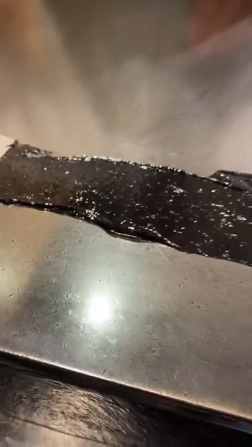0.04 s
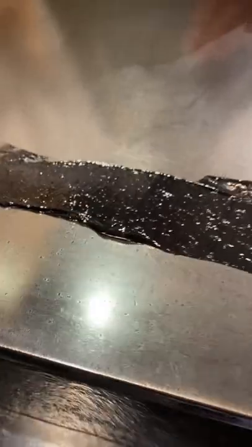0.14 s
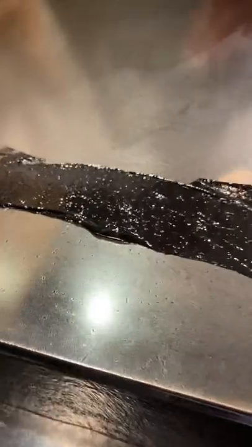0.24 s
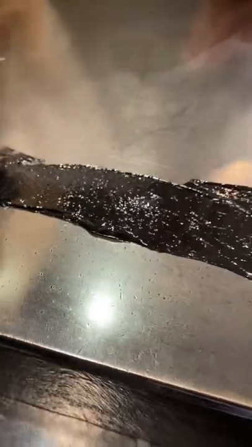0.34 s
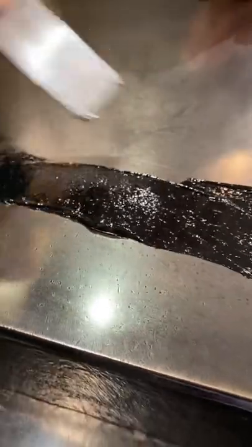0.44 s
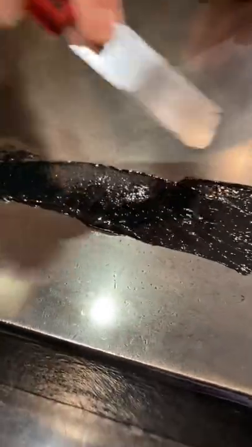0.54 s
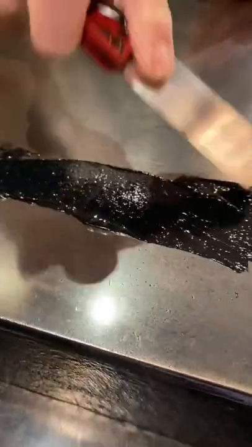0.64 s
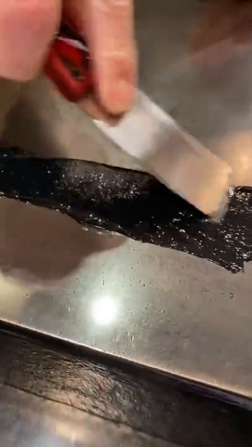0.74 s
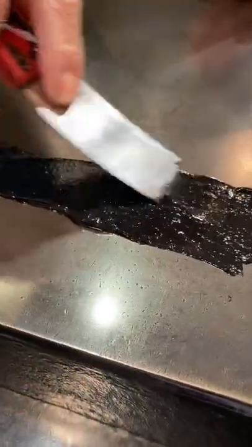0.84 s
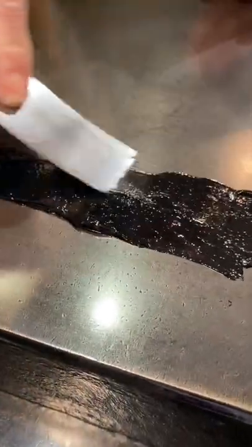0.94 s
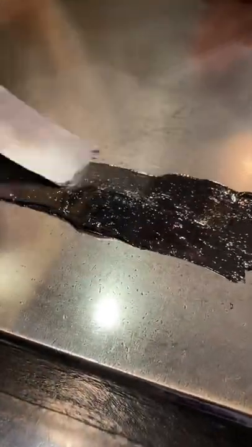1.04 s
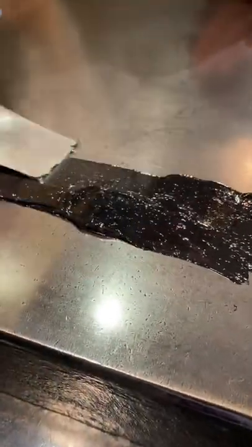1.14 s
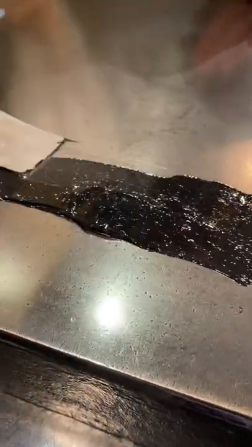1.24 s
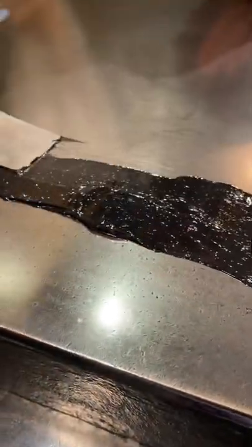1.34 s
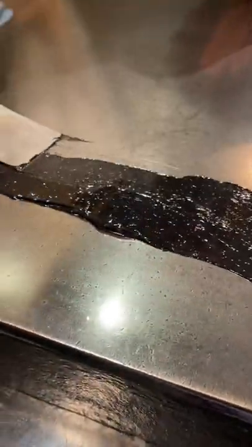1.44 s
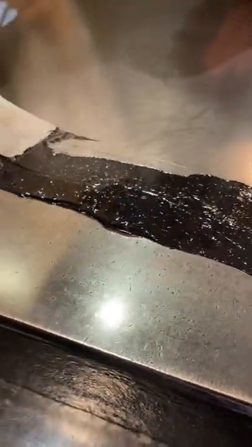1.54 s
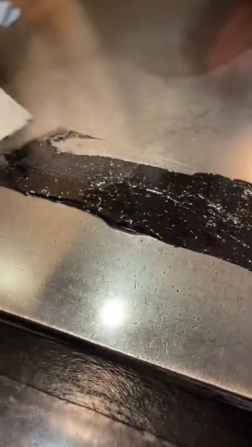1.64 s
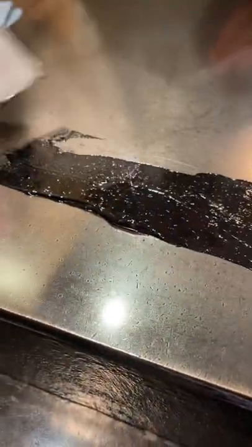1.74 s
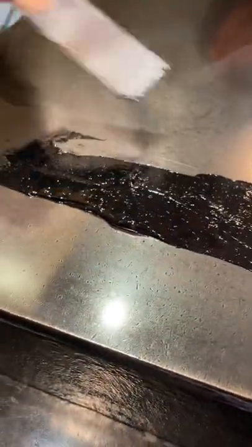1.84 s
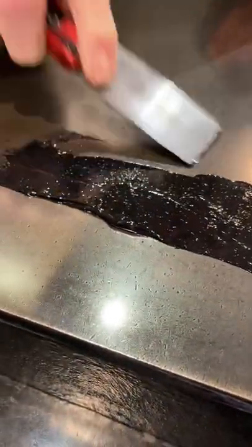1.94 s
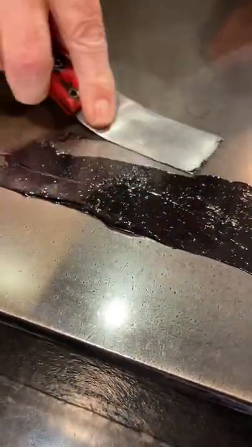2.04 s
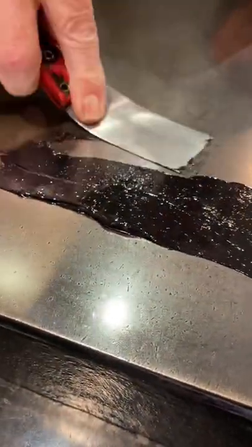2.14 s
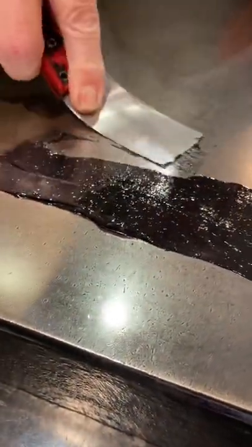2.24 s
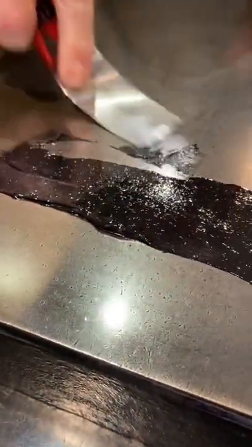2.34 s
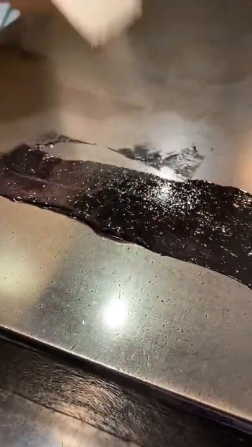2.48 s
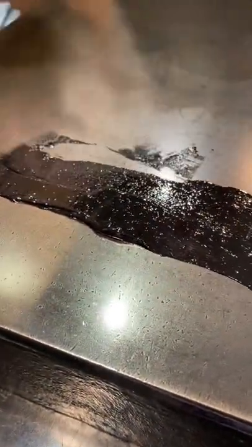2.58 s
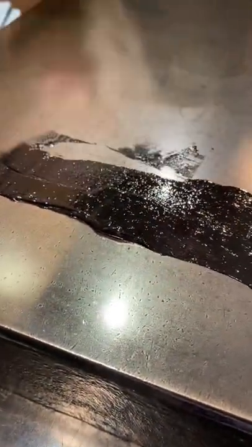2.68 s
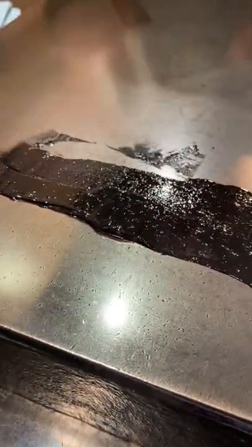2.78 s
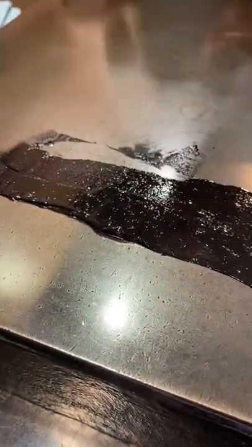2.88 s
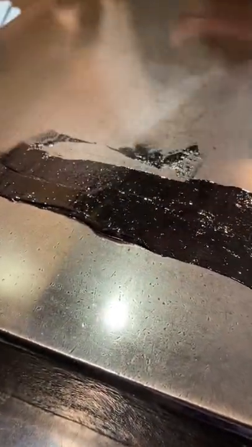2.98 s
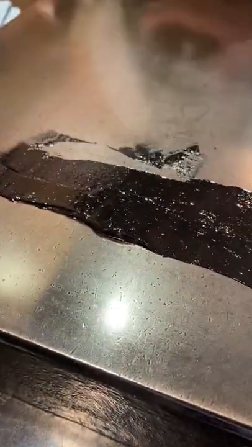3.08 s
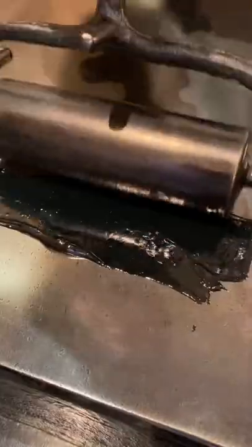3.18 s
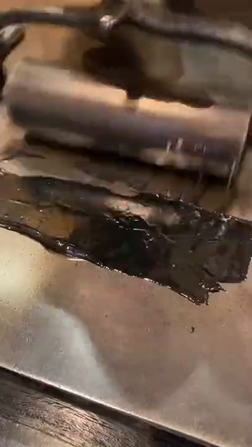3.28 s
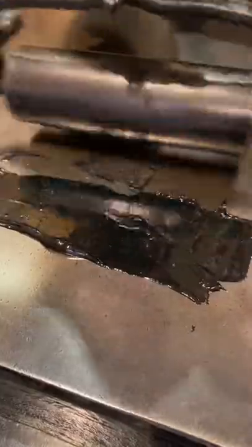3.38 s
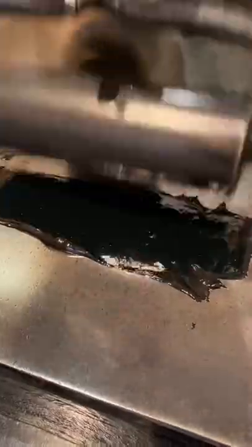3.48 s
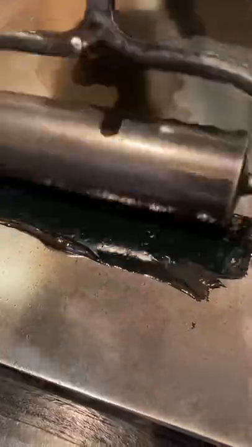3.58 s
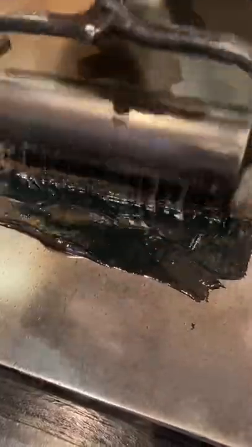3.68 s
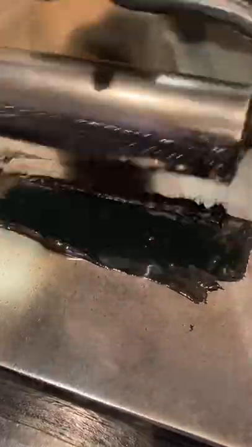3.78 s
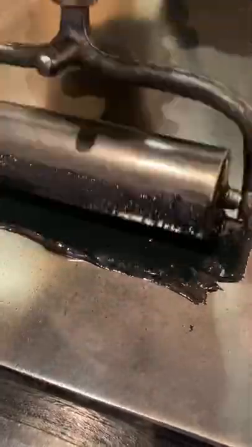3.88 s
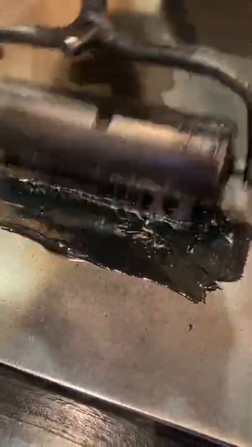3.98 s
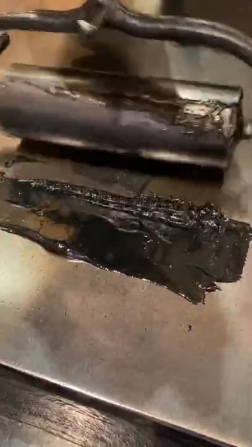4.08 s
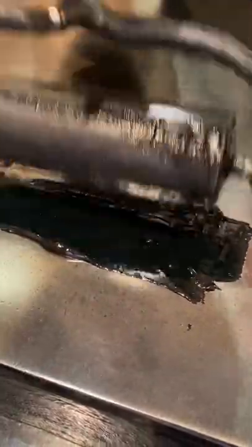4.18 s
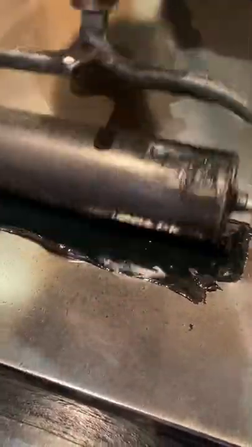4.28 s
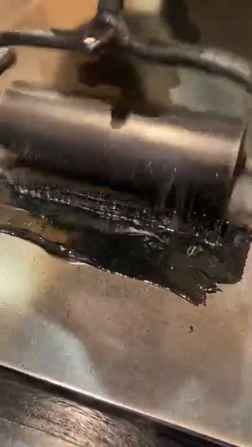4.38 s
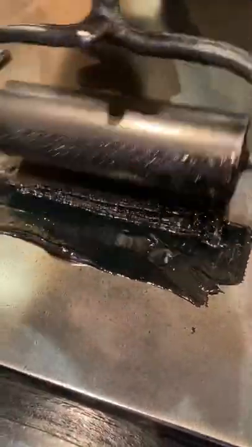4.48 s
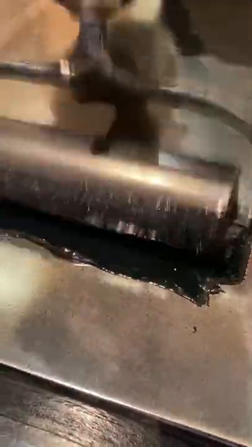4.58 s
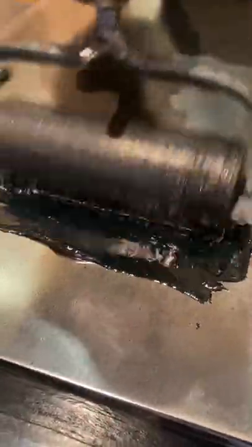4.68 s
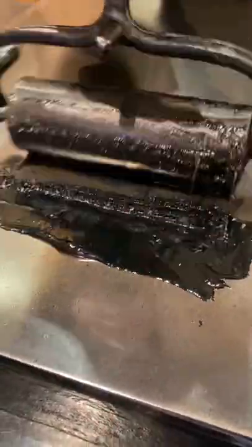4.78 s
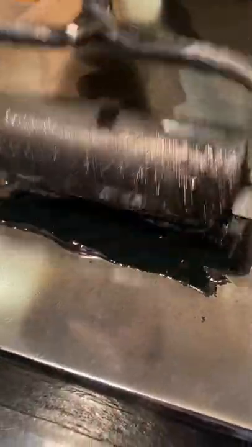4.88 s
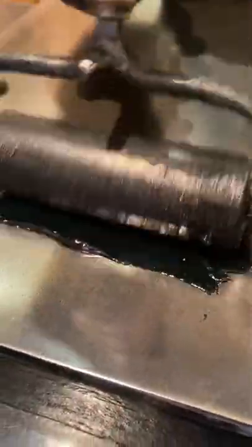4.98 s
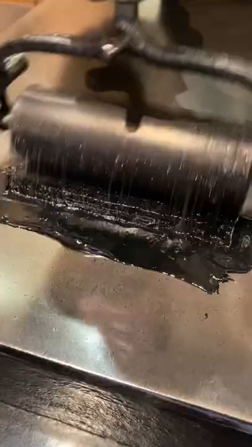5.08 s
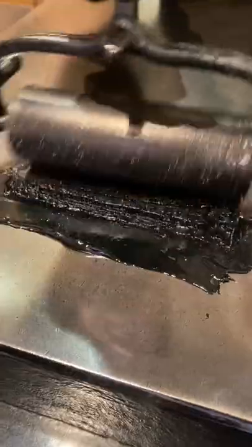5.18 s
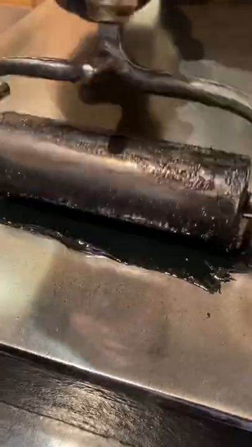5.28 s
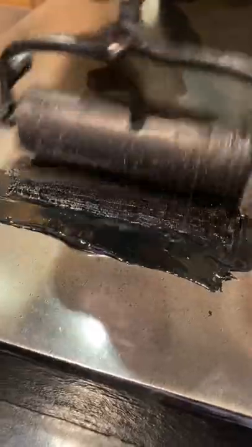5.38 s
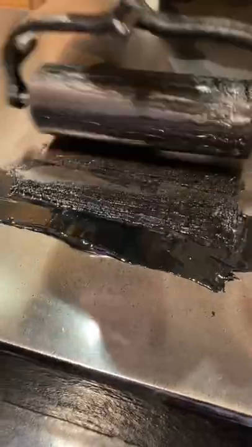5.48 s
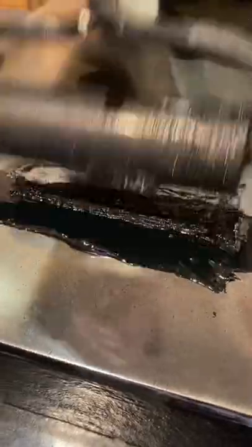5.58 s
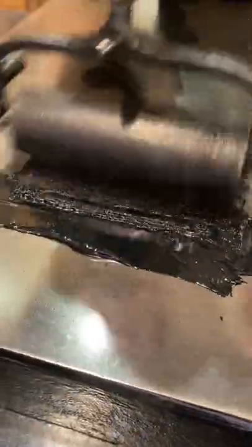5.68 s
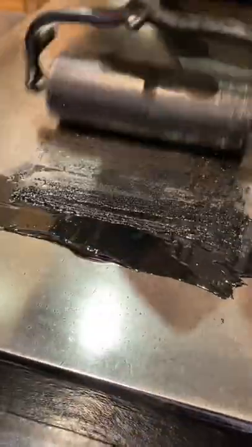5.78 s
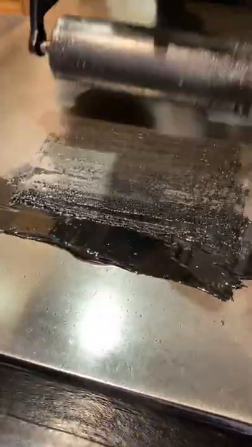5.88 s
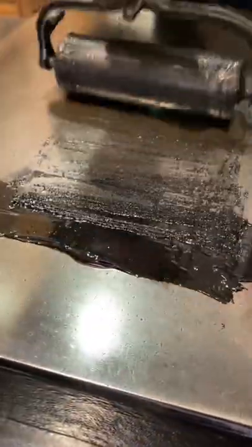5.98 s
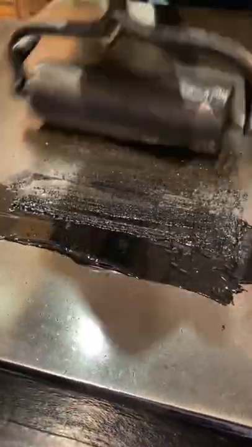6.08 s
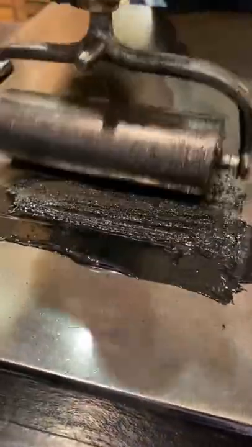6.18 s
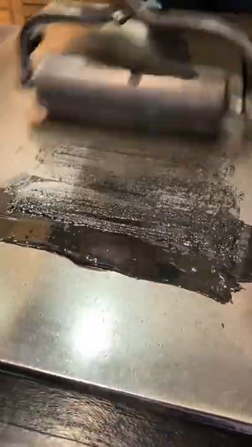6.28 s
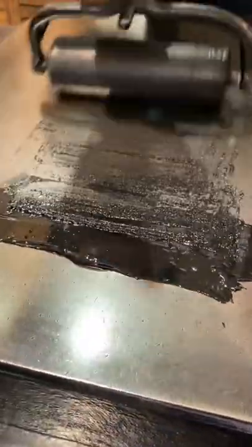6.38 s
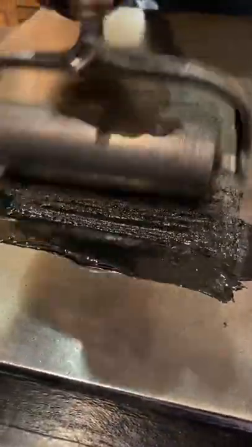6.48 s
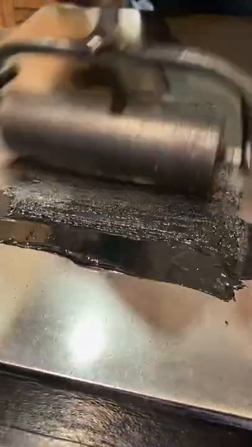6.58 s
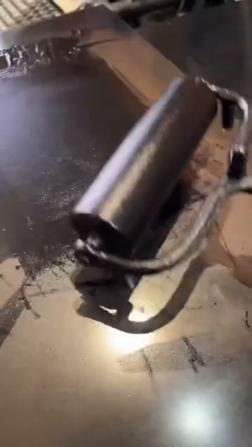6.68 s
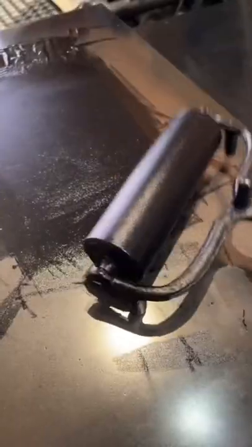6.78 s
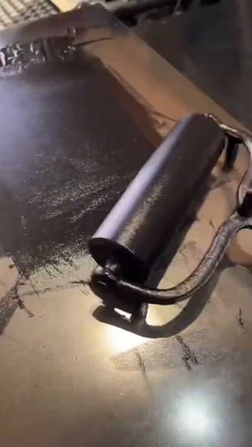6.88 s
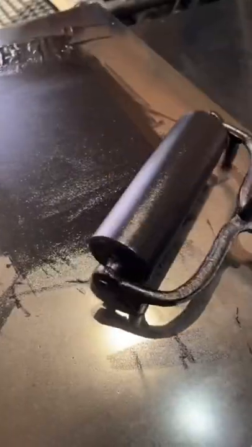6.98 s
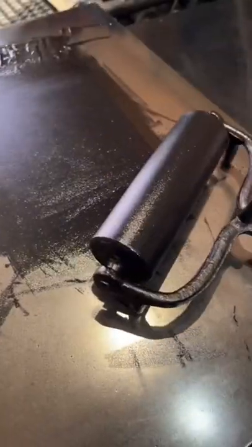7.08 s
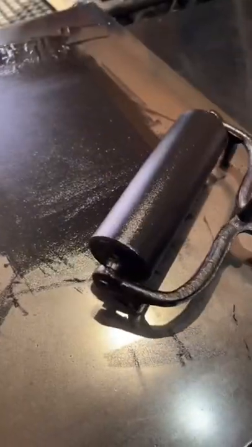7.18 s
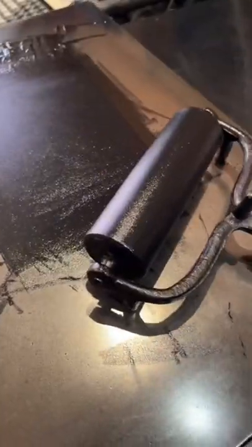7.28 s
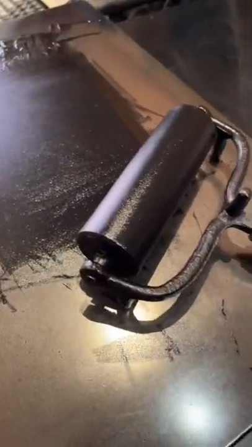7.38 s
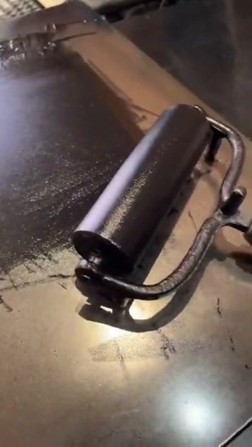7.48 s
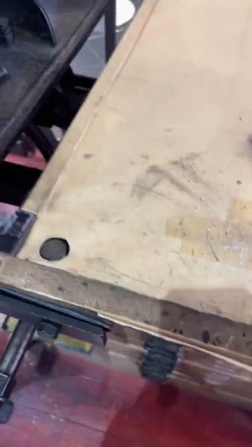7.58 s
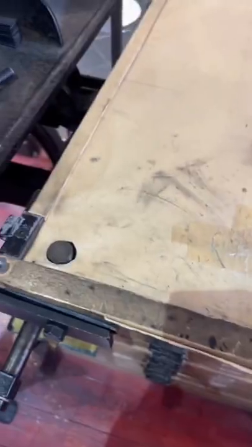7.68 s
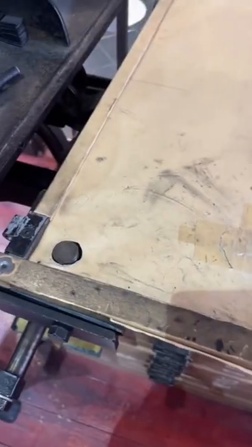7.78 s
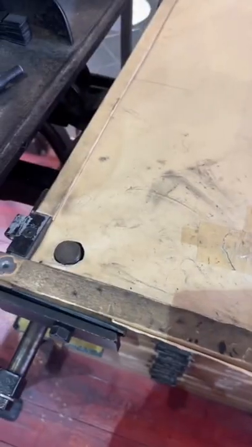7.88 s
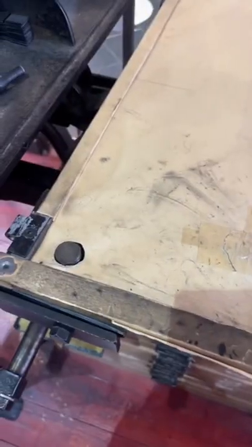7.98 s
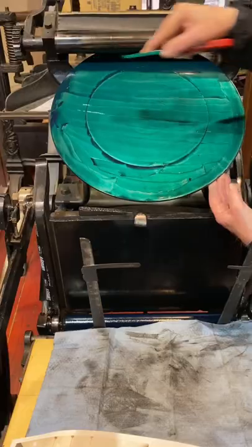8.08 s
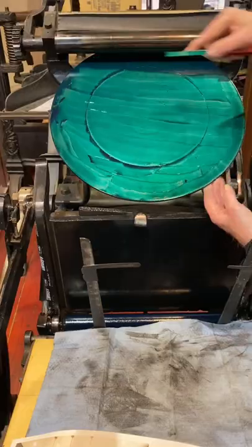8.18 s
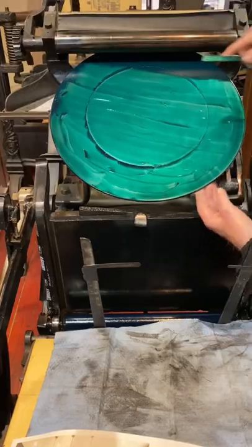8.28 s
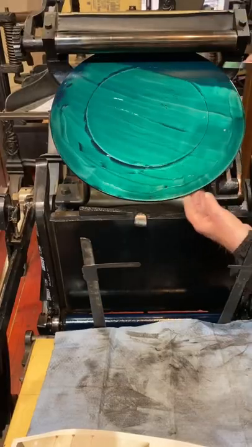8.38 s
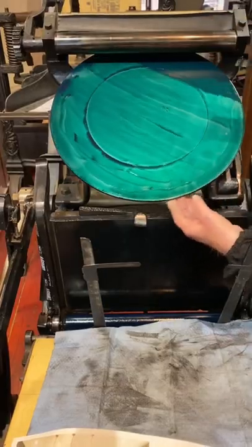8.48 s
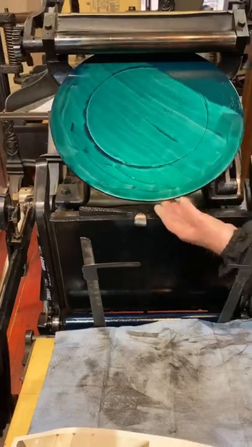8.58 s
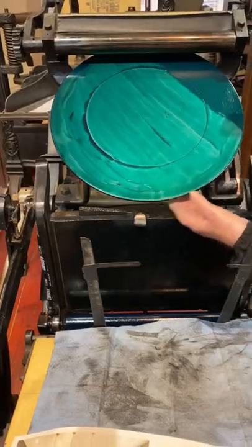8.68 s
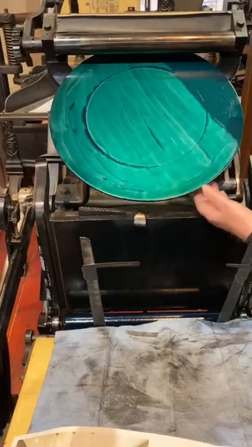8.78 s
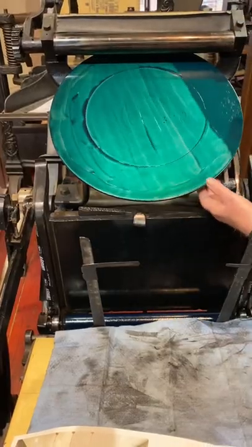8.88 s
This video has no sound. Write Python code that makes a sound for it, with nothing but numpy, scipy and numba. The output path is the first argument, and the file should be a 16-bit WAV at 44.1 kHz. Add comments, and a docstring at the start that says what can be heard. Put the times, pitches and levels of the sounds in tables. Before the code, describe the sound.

Close gritty knife scrapes and a sharp tap, ticking roller passes tearing tacky ink, then hard cuts to metallic clanks, a bang and ringing clicks.

```python
"""A knife scrapes a metal slab, then a roller lands, ticks and tears through tacky ink, both close and in stereo.
Hard cuts lead to mono print shop scenes: a roller set down, a bang on a bench, a ratchet ringing an iron disc.
Scraping is gritty noise through gliding resonances; tearing ink is hiss, random pops and lone snaps.
Blows are noise bursts plus decaying modes, landings are dull thumps, and an axle squeaks in sines.
Coloured noise makes the shop air, and diffuse noise tails make the rooms."""
import sys
import numpy as np
from scipy import signal
from scipy.fft import rfft, irfft, next_fast_len
from scipy.io import wavfile
from scipy.ndimage import uniform_filter1d
from numba import njit

SR = 44100
rng = np.random.default_rng(int(sys.argv[2]) if len(sys.argv) > 2 else 0)


def digitize_waveform(pressure):
    """Quantize a signal to 16-bit integers and store it at the path in sys.argv[1].

    Rows of a 2-D input are taken as channels; values are limited to [-1, 1].
    """
    field = np.atleast_2d(pressure).T
    bounded = np.clip(field, -1, 1)
    quanta = np.round(bounded * 32767).astype(np.int16)
    wavfile.write(sys.argv[1], SR, quanta)


def volts(x):
    """Linear amplitude factor 10**(x/20) for a level x in dB, scalar or array-like."""
    e = np.asarray(x, float) / 20
    return 10 ** e


N = 394254
TIME = np.arange(N) / SR

# scenes between cuts: (start [s], end [s], fade-in [s], top frequency [Hz])
SCENES = [(0, 3.14, .001, 15750), (3.14, 6.655, .015, 15750), (6.668, 6.885, .03, 6700),
          (6.888, 7.53, .02, 15800), (7.548, 7.86, .02, 6700), (7.862, 8.02, .025, 15800),
          (8.03, 8.95, .04, 15800)]
# how fast a rubbing contact comes and goes: (frequency [Hz], level [dB])
FLUTTER = [(1, -11.5), (20, -0.5), (90, 5.5), (250, -32)]


def colour(x, points):
    """Shapes the spectrum of x by (frequency [Hz], level [dB]) points and sets its rms to 1."""
    hz, db = np.transpose(points)
    size = next_fast_len(len(x))
    f = np.fft.rfftfreq(size, 1 / SR) + 1
    gain = volts(np.interp(np.log(f), np.log(hz), db))
    y = irfft(rfft(x, size) * gain, size)[:len(x)]
    return y / np.sqrt(np.mean(y ** 2))


def noise(points):
    """Coloured noise of rms 1, as long as the whole piece."""
    return colour(rng.standard_normal(N), points)


def curves(table):
    """A mask that is 1 within the table's time span, then its columns drawn against time."""
    s, *columns = np.transpose(table)
    on = (TIME >= s[0]) & (TIME < s[-1])
    return uniform_filter1d(1. * on, size=89), *(np.interp(TIME, s, c) for c in columns)


def fade(t, t60):
    """Exponential decay that falls 60 dB in t60 seconds."""
    return np.exp(-np.log(1000) * t / t60)


def add(out, s, x):
    """Mixes x into out from time s in seconds."""
    i = int(s * SR)
    out[i:i + len(x)] += x[:N - i]


@njit
def svf(x, hz, width):
    """Band-pass with a moving centre hz, a width in Hz and a gain of 1 at the centre."""
    y, b, l = np.empty(len(x)), 0., 0.
    for i in range(len(x)):
        g, k = np.tan(np.pi * hz[i] / SR), width / hz[i]
        v = (b + g * (x[i] - l)) / (1 + g * (g + k))
        b, l, y[i] = 2 * v - b, l + 2 * g * v, k * v
    return y


def room(x, decays):
    """A diffuse noise tail whose octaves die at their own pace."""
    t, (hz, t60) = np.arange(SR) / SR, np.transpose(decays)
    tail = 0
    for f in 90 * 2. ** np.arange(8):
        band = svf(rng.standard_normal(SR), np.full(SR, f), f * 0.88)
        band_t60 = np.clip(np.interp(np.log(f), np.log(hz), t60), .05, 3)
        tail = tail + band * fade(t, band_t60)
    tail = tail * np.clip(t / 0.011, 0, 1)
    return signal.fftconvolve(x, tail / np.sqrt(np.sum(tail ** 2)))[:len(x)]


def swell(rows, rise_db, drop_s, trail_s, trail_db):
    """Gain of rubbing strokes: a quick rise that levels off, a slide to the lift, a drop, a short weak trail."""
    out = np.zeros(N)
    for start, peak, lift, peak_db, lift_db, after_db in rows:
        times = [peak, lift, lift + drop_s, lift + trail_s, lift + 2.0 * trail_s]
        levels = [peak_db, lift_db, after_db, after_db + trail_db, after_db + trail_db - 23]
        db = np.interp(TIME, times, levels)
        db -= rise_db * np.clip((peak - TIME) / (peak - start), 0, 1) ** 2
        out += volts(db) * (TIME >= start) * (TIME < lift + 1.4 * trail_s)
    return uniform_filter1d(out, size=89)


def blows(events, modes, crack, crack_t60, ring_db, tilt_db, harder, early_db=-40):
    """Each blow is a burst of noise plus the object's modes, struck a little differently every time.
    The colour tilts by tilt_db per octave, and by `harder` more for each dB of strength."""
    out, t = np.zeros(N), np.arange(SR // 2) / SR
    hz, db, t60 = np.transpose(modes)[:, :, None]
    for s, strength_db in events:
        tilt = tilt_db + harder * strength_db
        shape = [(f, d + tilt * np.log2(f / 2000)) for f, d in crack]
        decay = (fade(t, crack_t60) + 1.19 * fade(t, 0.014)) / 3
        burst = colour(rng.standard_normal(len(t)), shape) * decay
        chance = rng.standard_normal((2, len(modes), 1))
        strike = volts(db + tilt * np.log2(hz / 2000) + 1.0 * chance[0])
        # loose parts make every mode waver as it dies
        waver_db = 55 * uniform_filter1d(rng.standard_normal((len(modes), len(t))), size=150)
        tones = np.sin(2 * np.pi * hz * (1 + .003 * chance[1]) * t)
        ring = np.sum(strike * volts(waver_db) * fade(t, np.clip(t60, .02, 1)) * tones, axis=0)
        contact = np.clip(t / 0.0011, 0, 1)
        cut = min(end for _, end, _, _ in SCENES if end > s)
        add(out, s, volts(strength_db) * contact * (burst + volts(ring_db) * ring) * (t < cut - s))
        # a faint noise swells and fades over the 10 ms ahead of the blow
        early_noise = colour(rng.standard_normal(440), shape) * np.hanning(440)
        add(out, s - .01, volts(strength_db + early_db) * early_noise)
    return out


def thumps(events):
    """Each landing gives a few dull cycles and a shorter, broad knock."""
    out, t = np.zeros(N), np.arange(SR // 5) / SR
    for s, thud_db, hz, knock_db in events:
        thud = np.sin(2 * np.pi * 87 * t) * fade(t, .11)
        shape = [(hz / 5, -25), (hz / 1.6, -2), (hz, 0), (1.6 * hz, -5), (4 * hz, -35), (20000, -90)]
        knock = colour(rng.standard_normal(len(t)), shape) * fade(t, 0.053)
        add(out, s, volts(thud_db) * thud + volts(knock_db) * knock)
    return out


def near_air():
    """Stereo shop air: one noise shared by both sides and a weaker one in opposite phase."""
    # shared and opposed colours: (frequency [Hz], level [dB])
    mid_colour = [(12, -56), (20, -26.5), (49, 1.5), (98, -2.5), (347, -13.5), (642, -24.5), (780, -29),
                  (849, -31), (2020, -37.5), (4300, -58.5), (5850, -51.5), (8650, -64.5), (16000, -65)]
    side_colour = [(12, -69), (20, -40), (134, -3), (399, -2.5), (642, -0.5), (1760, -17), (3740, -25),
                   (6720, -26.5), (11100, -33), (13900, -35), (16000, -35)]
    rolling_db = -3.5  # the shared air is quieter in the roller scene
    mid = volts(-39 + rolling_db * (TIME > SCENES[1][0])) * noise(mid_colour)
    side = volts(-56.5) * noise(side_colour)
    return mid + np.array([[1], [-1]]) * side


def blade_taps():
    """The knife blade touches down: a bright crack over short, high modes."""
    # touches: (time [s], strength [dB])
    touches = [(0.0876, -42), (1.3674, -40.5), (1.9207, -40), (1.9956, -4.5), (2.1034, -33)]
    # blade modes: (frequency [Hz], level [dB], t60 [s])
    blade_modes = [(1308, -14, .07), (2245, -3, .055), (3128, -12, .07), (3698, -10, .1), (4274, -10, .07),
                   (5520, -6, .09), (7332, -16, .05)]
    # crack colour: (frequency [Hz], level [dB])
    blade_crack = [(500, -32), (1200, -7), (2200, -7), (6000, 17.5), (10000, 18), (16000, 21)]
    return blows(touches, blade_modes, blade_crack, 0.039, -11, -4.0, 0.017)


def knife():
    """Gritty scraping that excites the free end of the blade; its resonance glides raggedly as the blade bends."""
    # strokes: (start [s], peak [s], lift [s], peak level [dB], level at the lift [dB], level after the drop [dB])
    strokes = [(.178, .265, .3, -25, -29.5, -48), (.884, .9, 1.11, -36, -39, -49.5),
               (1.615, 1.7, 1.747, -33.5, -34.5, -50.5), (2.0, 2.02, 2.11, -44, -55, -61),
               (2.398, 2.476, 2.484, -22, -27.5, -45.5), (2.7, 2.83, 2.86, -61, -63, -75)]
    # scrape colour: (frequency [Hz], level [dB])
    scrape_colour = [(800, -40), (1500, -20), (2800, -6), (4000, 0), (5000, -5), (7000, -3), (8500, -6),
                     (11000, -2), (12500, -5), (15000, -2), (16000, -6)]
    # blade bending: (start [s], end [s], from [Hz], to [Hz], resonance level before bending [dB])
    bends = [(.178, .3, 3977, 1900, -4), (.884, 1.06, 2900, 3070, -18), (1.06, 1.26, 3590, 3550, -7.5),
             (1.615, 1.688, 3720, 3460, 2.5), (1.688, 1.712, 3370, 2850, -17),
             (1.712, 1.734, 2760, 1850, -3.5), (2.0, 2.14, 2270, 2220, -7.5),
             (2.398, 2.445, 2980, 2286, -6.5), (2.45, 2.482, 3040, 2068, -8.5),
             (2.7, 2.92, 3485, 3540, -16.5)]
    bend_power = 2.8  # above 1: the pitch moves ever faster
    bent_db = -12.5  # change of resonance per octave of sinking
    hz, ring_db = np.full(N, 1. * bends[0][2]), np.zeros(N)
    for start, end, from_hz, to_hz, db in bends:
        on = TIME >= start
        progress = np.clip((TIME[on] - start) / (end - start), 0, 1)
        hz[on] = from_hz + (to_hz - from_hz) * progress ** bend_power
        ring_db[on] = db + bent_db * np.log2(from_hz / hz[on])
    hz = hz * (1 + 0.0046 * noise(FLUTTER))
    grit = rng.standard_normal(N) * volts(1.6 * rng.exponential(size=N))
    first = 1.4 * svf(svf(grit, hz, 150.0), hz, 150.0)
    # the second resonance speaks fully only once the pitch has sunk
    second = volts(-4.5) * svf(grit, 1.42 * hz, 79.0) * np.clip((3500 - hz) / 400, .15, 1)
    third = volts(-2.5) * svf(grit, 2.05 * hz, 120.)
    ring = first + second + third
    squeal = volts(ring_db + 6.75 * noise(FLUTTER)) * ring / np.std(ring)
    stroke = swell(strokes, rise_db=27, drop_s=0.017, trail_s=.13, trail_db=-15.5)
    return stroke * volts(1.5 * noise(FLUTTER)) * (colour(grit, scrape_colour) + squeal)


def squeak():
    """The axle squeaks: a thin whistle of wavering level with its octave."""
    # whistles: (start [s], peak [s], stop [s], peak level [dB], level at the stop [dB], level after the drop [dB])
    whistles = [(1.45, 1.6, 2.6, -80, -74.5, -85), (2.9, 3.05, 4.4, -73.5, -75, -89),
                (3.418, 3.4245, 3.432, -7, -15, -66)]
    waver = volts(1.2 * noise(FLUTTER))
    phase = 2 * np.pi * 6852 * TIME
    gain = swell(whistles, rise_db=32.5, drop_s=0.035, trail_s=0.12, trail_db=-8)
    return gain * waver * (np.sin(phase) + volts(-16.5) * np.sin(2 * phase))


def slab_thumps():
    """Weight lands on the slab, whose knock changes pitch with the spot."""
    # landings: (time [s], thud level [dB], knock frequency [Hz], knock level [dB])
    landings = [(2.407, -31, 297, -25.5), (3.235, -26, 501.4, -35), (3.582, -26, 294.5, -35.5),
                (3.933, -30, 269, -28.5), (4.293, -18, 221.3, -22), (4.994, -21, 245.3, -24),
                (5.374, -38, 478, -42.5), (5.676, -15.5, 333, -16), (6.044, -23.5, 455.3, -23.5)]
    return thumps(landings)


def frame_taps():
    """The roller frame ticks: a bright crack and a little ring, with a faint noise just ahead."""
    # ticks: (time [s], strength [dB])
    ticks = [(3.2352, 0.5), (3.5204, -10.5), (3.5843, -0.5), (3.8876, -31.5), (3.9317, 0.5), (4.2504, -7),
             (4.2877, -4.5), (4.2909, 0), (4.637, -17), (4.678, -19), (4.9903, -7), (5.0267, -11),
             (5.2156, -23), (5.316, -26), (5.3687, -5), (5.6366, -22.5), (5.664, -20), (5.677, -0.5),
             (5.9738, -12), (6.0092, -32.5), (6.0401, -1.5), (6.2486, -26), (6.559, -7.5)]
    # frame modes: (frequency [Hz], level [dB], t60 [s])
    frame_modes = [(2120, -12, .04), (3300, -14, .04), (4330, -23, .25), (6100, -8, .05), (8600, -12, .04),
                   (13300, -5, .05)]
    # crack colour: (frequency [Hz], level [dB])
    frame_crack = [(300, -8), (1000, -6.5), (3000, -7), (6000, -0.5), (10000, 5.5), (14000, -5),
                   (16000, -7.5)]
    return blows(ticks, frame_modes, frame_crack, 0.03, -18.5, 1.0, 0.015, early_db=-30.0)


def roller():
    """Ink threads tear: a fine hiss, a crackle of very uneven size and pitch, and lone loud snaps."""
    # passes: (start [s], peak [s], lift [s], peak level [dB], level at the lift [dB], level after the drop [dB])
    passes = [(3.25, 3.29, 3.34, -37, -41.5, -55.5), (3.645, 3.71, 3.764, -30, -35, -55.5),
              (3.98, 4.012, 4.03, -24.5, -22, -39.5), (4.336, 4.39, 4.42, -23, -24.5, -40.5),
              (4.675, 4.742, 4.705, -21.5, -26, -20), (5.032, 5.06, 5.074, -24, -19.5, -44),
              (5.072, 5.085, 5.127, -26.5, -24.5, -36.5), (5.37, 5.382, 5.464, -24.5, -28.5, -50),
              (5.682, 5.707, 5.78, -23.5, -31.5, -30), (6.05, 6.175, 6.235, -33, -41, -55.5),
              (6.242, 6.255, 6.315, -26, -30.5, -44.5), (6.28, 6.302, 6.39, -31.5, -25.5, -51.5),
              (6.41, 6.505, 6.552, -34.5, -22, -31.5), (6.594, 6.61, 6.645, -22.5, -26.5, -50)]
    # tearing colour: (frequency [Hz], level [dB])
    tear_colour = [(400, -30), (1000, -16), (2500, -11), (4000, -7), (5500, -2), (7000, 0), (10000, -1),
                   (13000, 0), (15000, 0), (16000, -5)]
    # loudest threads snapping: (time [s], level [dB], centre [Hz])
    loud_snaps = [(3.6579, -19.5, 2295), (3.6974, -23, 3570), (3.7096, -1.5, 2280), (3.998, -22, 6920),
                  (4.0264, -6.5, 5640), (4.099, -25, 5730), (4.342, -13, 2420), (4.3581, -16.5, 2220),
                  (4.3681, -12, 2260), (4.3748, -9.5, 5780), (4.3857, -5, 3550), (4.4026, -25, 5450),
                  (4.413, -20, 5580), (4.6936, -14, 3470), (4.7037, -21, 2400), (4.7448, -18, 5200),
                  (4.756, -14.5, 3500), (5.057, -16, 4170), (5.0615, -14.5, 5700), (5.4848, -16, 5730),
                  (5.7096, -14, 6390), (6.2961, -28, 7060)]
    # ink rolled thin: (time [s], crackle level over the hiss [dB], gain below 3 kHz [dB])
    thinning = [(3.2, 3, 5.5), (5.8, 3, 3.5), (6.1, -8, 6), (6.66, -3.5, 5)]
    rolling = swell(passes, rise_db=20, drop_s=0.0027, trail_s=0.064, trail_db=-5)
    _, crackle_db, bass_db = curves(thinning)
    pops = 0
    for hz in 1000 * 2. ** np.arange(4):
        chance = rng.random((N, 2))
        size = (chance[:, 0] < .008) * volts(-4. * np.log(chance[:, 1].clip(.03)))
        pops = pops + svf(size, np.full(N, 2.7 * hz), 1.2 * hz)
    tear = noise(tear_colour) + volts(crackle_db) * colour(pops, tear_colour)
    low = signal.lfilter(*signal.butter(2, 3000, fs=SR), tear)
    out = rolling * volts(2.8 * noise(FLUTTER)) * (tear + (volts(bass_db) - 1) * low)
    t = np.arange(132) / SR
    for s, snap_db, hz in loud_snaps:
        click = rng.standard_normal(len(t)) * fade(t, 0.0037)
        tone = 1.33 * np.sin(2 * np.pi * hz * t) * fade(t, 4.8 / hz)
        add(out, s, volts(snap_db) * (click + tone))
    return out


def ports(x):
    """Two microphone ports hear a near source with a phase gap that depends on pitch, widest in the treble."""
    # phase gap: (frequency [Hz], lead of the left [rad])
    port_lead = [(0, 0), (2000, 0.05), (3500, 1), (4800, 2), (6200, 1), (8000, 3.5), (11500, 3), (13000, 5),
                 (16000, 4.5)]
    hz, lead = np.transpose(port_lead)
    size = next_fast_len(N)
    half = np.interp(np.fft.rfftfreq(size, 1 / SR), hz, lead) / 2
    return irfft(rfft(x, size) * np.exp(1j * np.array([half, -half])), size)[:, :N]


def slab():
    """Stereo slab work: knife, roller, taps and thumps with their room, and the shop air."""
    # room decay: (frequency [Hz], t60 [s])
    near_decay = [(200, 0.92), (2000, 0.82), (6000, 0.64), (14000, 0.12)]
    # where the sides differ most: (frequency [Hz], level [dB])
    spread_colour = [(300, -25), (1500, -16), (3000, -8), (4200, 0), (5500, -6), (7500, -14), (8500, -35),
                     (11000, -35), (12500, -6), (16000, -2)]
    near = blade_taps() + knife() + squeak() + slab_thumps() + frame_taps() + roller()
    near += volts(-24.0) * room(near, near_decay)
    # blade and roller are wide: other threads along them reach the ports by unlike paths
    wide = colour(knife() + roller(), spread_colour)
    sides = np.array([wide, np.roll(wide, shift=70)])
    return ports(near) + volts(-40) * sides + near_air()


def far_air():
    """Mono shop air: a wash and a low rumble of changing level, then a quieter noise."""
    # louder shop: (time [s], wash level [dB], rumble level [dB])
    wash_levels = [(6.67, -36.5, -31.5), (6.778, -34, -36.5), (6.992, -27, -48), (7.24, -34.5, -29.5),
                   (7.428, -36, -29.5), (7.654, -35.5, -33.5), (7.812, -25.5, -36.5), (7.862, -27, -34),
                   (7.982, -31.5, -36.5), (8.02, -33, -30.5)]
    # wash and quiet colours: (frequency [Hz], level [dB])
    wash_colour = [(65, -24.5), (110, -4.5), (233, -8.5), (258, -5), (332, -6.5), (583, -15), (1520, -11.5),
                   (2120, -23), (2610, -21), (4980, -40), (16000, -78)]
    quiet_colour = [(12, -28.5), (20, 3), (36, -11.5), (86, -23), (193, -25.5), (642, -32), (897, -30.5),
                    (1330, -46), (6720, -58.5), (9140, -58), (16000, -57)]
    on, wash_db, rumble_db = curves(wash_levels)
    rumble = noise([(25, -17.0), (47, -4.5), (60, 5.0), (78, -3.5), (120, -64)])
    busy = volts(wash_db) * noise(wash_colour) + volts(rumble_db) * rumble
    return on * busy + (1 - on) * volts(-46.5) * noise(quiet_colour)


def set_down():
    """The roller is set down: clanks of ringing modes, and a thump as the roller drops last."""
    # clanks: (time [s], strength [dB])
    clanks = [(6.814, 2), (6.821, -10), (6.848, -0.5), (6.909, -4), (7.052, -2), (7.065, -6.5)]
    # modes: (frequency [Hz], level [dB], t60 [s])
    stand_modes = [(259, -10, 0.42), (837, -15, 0.17), (1120, -15.5, 0.11), (1286, -12, 0.5),
                   (1510, 1.5, 0.16), (1752, -0.5, 0.2), (1823, -4, 0.2), (1790, -2, 0.2),
                   (1940, 6.5, 0.095), (2116, -10.5, 0.28), (2700, -12.5, 0.086), (3850, -22.5, 0.21),
                   (5350, -34, 0.23)]
    # crack colour: (frequency [Hz], level [dB])
    stand_crack = [(100, -24.5), (260, -8.5), (700, -19.5), (1200, -3.5), (1850, 1), (2600, -8.5),
                   (3600, -20.5), (6000, -29), (16000, -53)]
    # last drop: (time [s], thud level [dB], knock frequency [Hz], knock level [dB])
    last_drop = [(7.053, -30.5, 802, -9.5)]
    return blows(clanks, stand_modes, stand_crack, 0.053, -15.5, 0.18, 0.14) + thumps(last_drop)


def bench_bang():
    """Something heavy bangs on a bench: a long, dark crack over the bench's modes."""
    # bangs: (time [s], strength [dB])
    bangs = [(7.623, 2.5), (7.64, -7), (7.658, -17.5), (7.679, -1.5), (7.704, -5.5)]
    # bench modes: (frequency [Hz], level [dB], t60 [s], held to 1 at most)
    bench_modes = [(413, -18.5, 5.0), (683, -6, 0.65), (980, -8, 0.86), (1367, 6, 0.37), (1595, 4, 0.15),
                   (1740, -2, 0.3), (2089, -18, 0.41), (2140, -7.5, 0.64), (2350, -7, 0.34),
                   (2422, 0.5, 0.21), (2450, -4.5, 0.27), (2905, -5.5, 0.31), (3300, -12.5, 0.3),
                   (4670, -31.5, 0.28), (5730, -22.5, 0.3)]
    # crack colour: (frequency [Hz], level [dB])
    bench_crack = [(59, -32.5), (100, -13.5), (410, -2.5), (750, -11.5), (1270, -6), (1420, -3),
                   (2550, -8.5), (6410, -31), (7050, -68), (9000, -63.5), (11700, -108), (19800, -120)]
    return blows(bangs, bench_modes, bench_crack, .22, -27.5, .3, 0.37)


def ratchet():
    """A ratchet rings the many modes of a press's iron ink disc."""
    # clicks: (time [s], strength [dB])
    clicks = [(8.319, -51.5), (8.388, -42), (8.501, -34), (8.537, -37), (8.63, -11.5), (8.7, -22.5),
              (8.779, -30.5), (8.9, -10.5)]
    # disc modes: (frequency [Hz], level [dB], t60 [s])
    disc_modes = [(727, -18, .4), (1066, -1, .4), (1405, -12, .8), (1776, -5, .35), (1895, -8, .6),
                  (2186, -5, .55), (2627, -4, .3), (2842, -6, .1), (3106, -8, .5), (3445, -8, .2),
                  (3612, -12, .3), (3725, -15, .5), (4177, -5, .12), (4382, 1, .18), (4581, -14, .3),
                  (4775, -9, .3), (5500, -3, .15), (6121, -13, .22), (6508, -12, .3), (7617, -14, .3),
                  (8726, -20, .16)]
    # crack colour: (frequency [Hz], level [dB])
    disc_crack = [(88, -52), (150, -5), (888, -6), (1060, 0.5), (1530, -17), (1830, -10.5), (3920, -12.5),
                  (4320, -8), (5150, -25), (6640, -20.5), (16000, -51.5)]
    return blows(clicks, disc_modes, disc_crack, 0.1, -19.0, 3.65, 0.24)


def scene():
    """Two stereo scenes, then mono ones with a room of their own; each fades in and is cut off hard."""
    # room decay: (frequency [Hz], t60 [s])
    far_decay = [(200, 0.27), (1500, 0.75), (4000, 0.4), (10000, 0.12)]
    stereo = slab()
    air = far_air()
    struck = set_down() + bench_bang() + ratchet()
    out = np.zeros((2, N))
    for k, (start, end, fade_in, top_hz) in enumerate(SCENES):
        i, j = int(start * SR), int(end * SR)
        if k < 2:
            part = stereo[:, i:j]
        else:
            hits = struck[i:j]
            part = hits + volts(-14.5) * room(hits, far_decay) + air[i:j]
        low_pass = signal.ellip(8, .2, 70, top_hz, fs=SR, output="sos")
        part = signal.sosfilt(low_pass, np.clip(part, -1, 1))
        opening = np.clip((TIME[i:j] - start) / fade_in, 0, 1)
        closing = np.clip((end - TIME[i:j]) / 0.0012, 0, 1)
        out[:, i:j] = part * opening * closing
    return out


def roll_off(x):
    """The treble ends steeply here."""
    return signal.sosfilt(signal.butter(12, 16830, fs=SR, output="sos"), x)


def record(dry):
    """Peaks clip at full scale."""
    mix = np.clip(dry, -1, 1)
    return roll_off(mix)


dry = scene()
out = record(dry)
digitize_waveform(out)
```